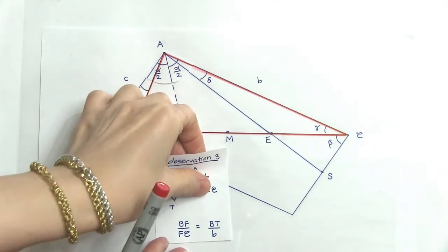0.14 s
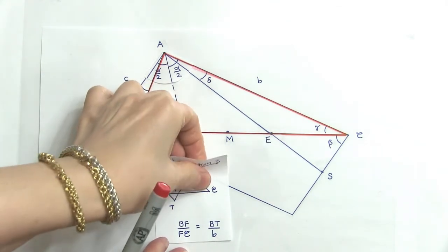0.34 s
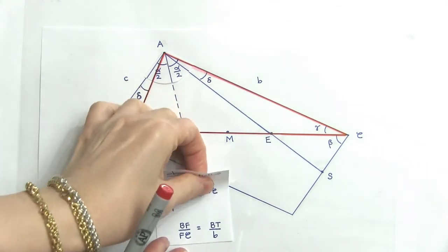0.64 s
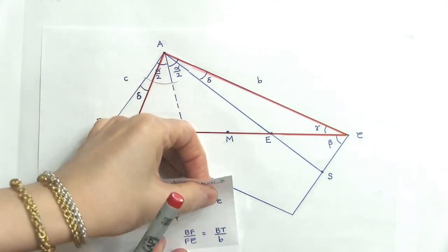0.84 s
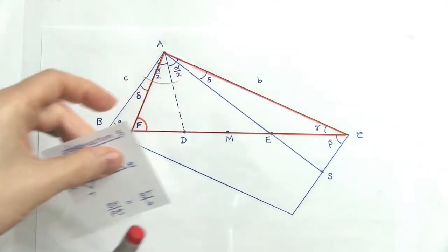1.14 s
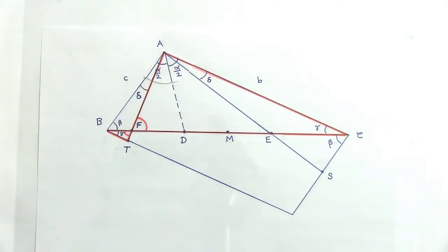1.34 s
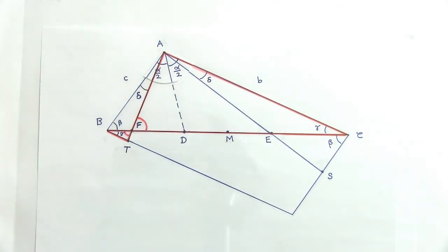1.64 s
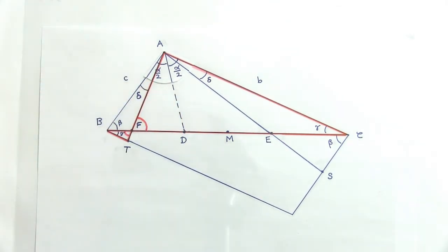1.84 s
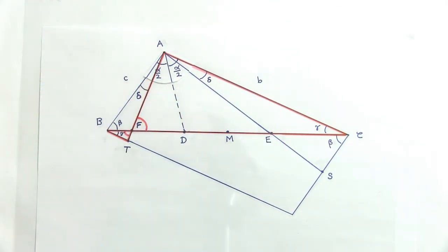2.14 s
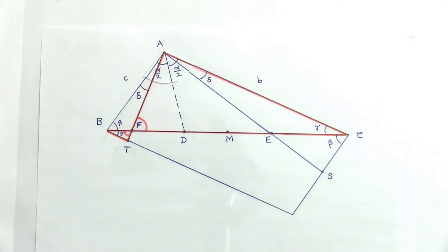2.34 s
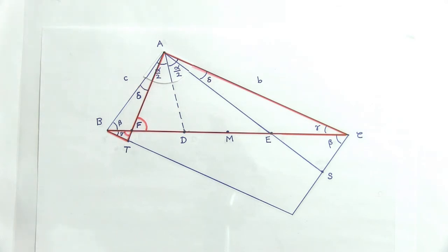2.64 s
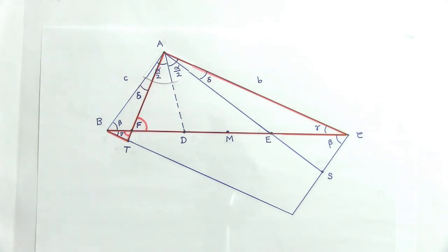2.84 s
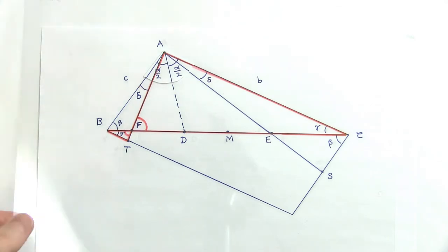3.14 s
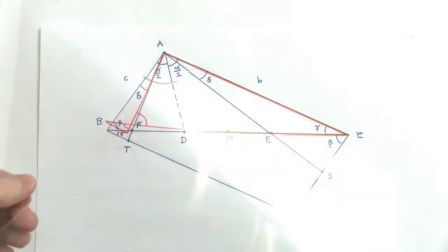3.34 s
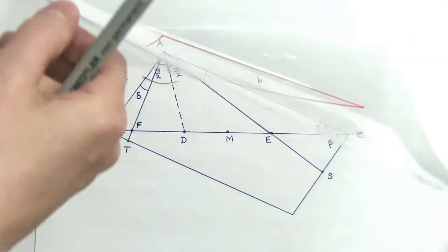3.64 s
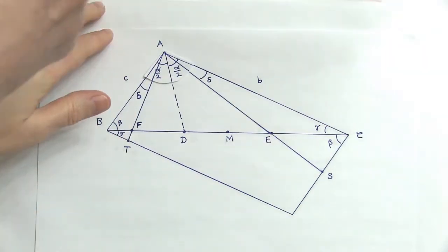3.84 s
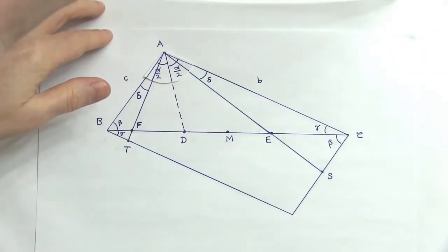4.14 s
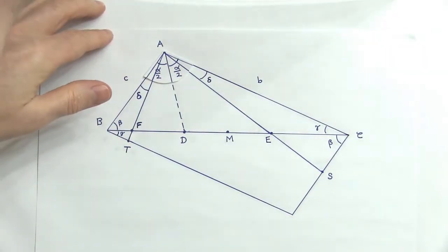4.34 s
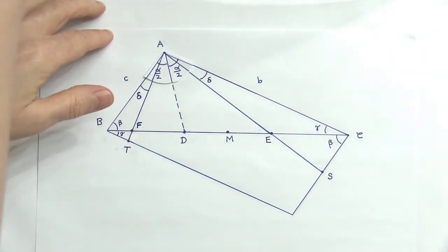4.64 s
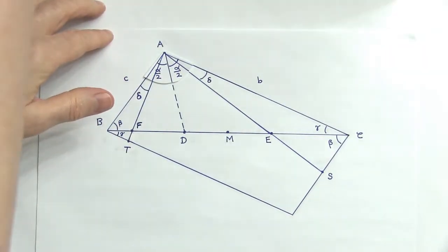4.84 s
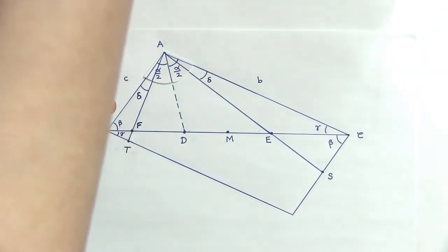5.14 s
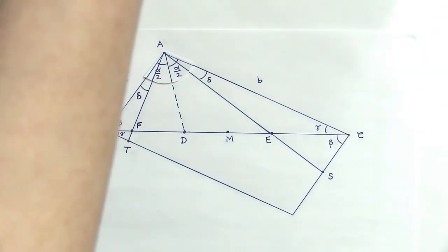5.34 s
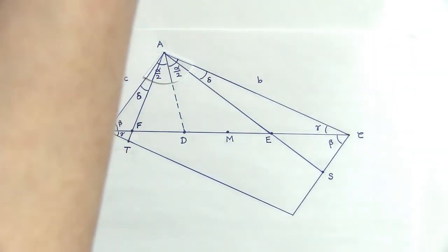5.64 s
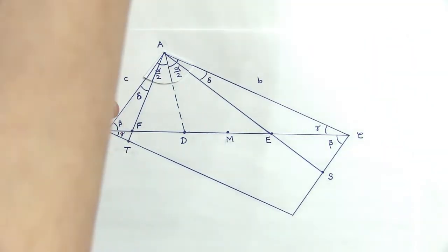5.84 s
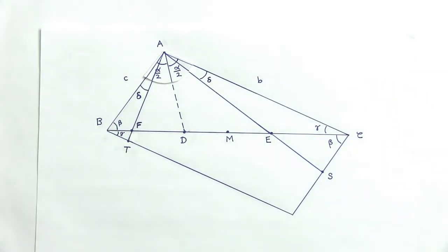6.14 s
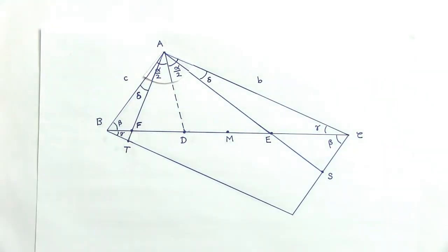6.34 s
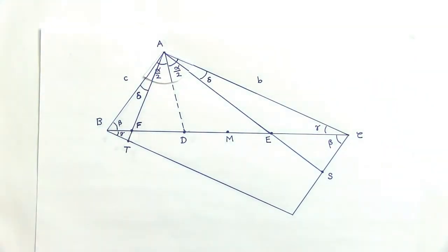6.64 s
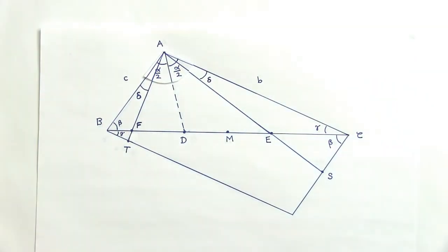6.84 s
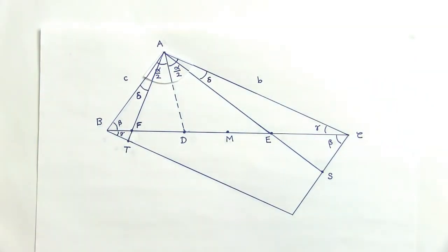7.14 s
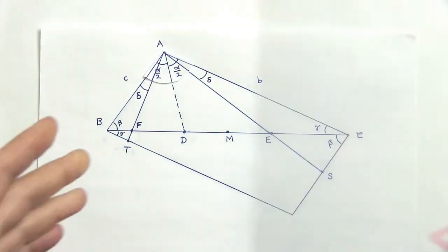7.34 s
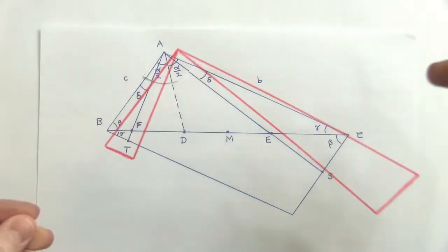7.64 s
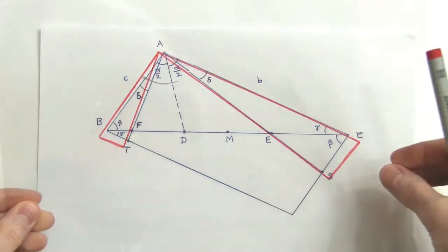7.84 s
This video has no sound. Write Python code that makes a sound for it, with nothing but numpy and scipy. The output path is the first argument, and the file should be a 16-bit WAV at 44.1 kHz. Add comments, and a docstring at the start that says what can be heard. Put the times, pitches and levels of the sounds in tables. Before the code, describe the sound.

A stiff paper card ticks, rubs and snaps sharply on a tabletop, then clear plastic sheets crackle, pop and flex with hollow wobbles.

```python
"""Card and plastic sheets on a tabletop

A small room, close handling at the microphone: a hand picks up a paper card, which ticks, rubs and snaps.
Clear plastic sheets are then peeled off and laid down, crackling and flexing with hollow wobbles.
Handling is noise swells coloured by bending panel and table; snaps are decaying modes, wobbles gliding tones.
Filtered-noise hum, drones and thin hiss lie underneath and drop after the last card sound."""
import sys
import numpy as np
from scipy import signal
from scipy.fft import rfft, irfft
from scipy.io import wavfile
from scipy.ndimage import uniform_filter1d

SR = 44100
rng = np.random.default_rng(int(sys.argv[2]) if len(sys.argv) > 2 else 0)


def dump_mix(stems):
    """Bounce the given channels to the path in sys.argv[1] as a 16-bit WAV at rate SR."""
    frames = np.atleast_2d(stems).T  # one column per channel
    limited = np.clip(frames, -1, 1)  # hard clip at full scale
    pcm = np.round(limited * 32767).astype(np.int16)
    wavfile.write(sys.argv[1], SR, pcm)


N = 352932  # samples, about 8 s

SIZE = 2 ** 14  # samples in one handling sound or room response
CUTOFF_HZ = 15700  # top of the recorded band


def from_db(db):
    """Decibels to gain."""
    return 10 ** (np.asarray(db) / 20)


def rms_one(x):
    """Scale to rms 1."""
    return x / np.sqrt(np.mean(x ** 2) + 1e-30)


def frequencies(size):
    """Frequency of each bin of a real FFT, in Hz, at least 1."""
    return np.maximum(np.fft.rfftfreq(size, 1 / SR), 1)


def at_hz(points, hz):
    """Read a table on a log-frequency axis."""
    f, value = np.transpose(points)
    return np.interp(np.log(hz), np.log(f), value)


def add(out, sound, s):
    """Mix a sound in from time s."""
    start = max(round(s * SR), 0)
    out[:, start:start + sound.shape[-1]] += sound[..., :N - start]


def mixed(sounds):
    """Lay (sound, start time) pairs on one stereo track."""
    out = np.zeros((2, N))
    for sound, s in sounds:
        add(out, sound, s)
    return out


def stereo(pair, alike):
    """Two unrelated signals become left and right with a given likeness (their correlation)."""
    alike = np.clip(alike, -1, 1)
    middle = np.sqrt((1 + alike) / 2) * pair[0]
    side = np.sqrt((1 - alike) / 2) * pair[1]
    return middle + side * [[1], [-1]]


def causal(gain):
    """Minimum-phase response with this gain: nothing sounds before its cause."""
    cepstrum = irfft(np.log(gain + 1e-9))
    cepstrum[..., 1:SIZE // 2] *= 2
    cepstrum[..., SIZE // 2 + 1:] = 0
    return np.exp(rfft(cepstrum))


STIFF_HZ, CRACKLE_DB_PER_OCTAVE = 3000, 4.5


def crackle_of(hz, stiff_db):
    """The stiffer (higher pitched) the spot touched, the more fine crackle it throws off."""
    return stiff_db + CRACKLE_DB_PER_OCTAVE * np.log2(hz / STIFF_HZ)


# The card, small and stiff, ticking against fingers and table.
# Each row: peak time in seconds, level in dB, fall time in seconds, centre in Hz, table knock in dB.
CARD_TICKS = [(.04, -47, 0.0039, 1176, -14.5), (.211, -42.5, 0.0063, 474, 2),
              (0.1104, -25.5, 0.0014, 5440, -1), (0.269, -31.5, 0.0031, 6160, -1),
              (0.275, -38, 0.0011, 6460, 2), (0.4081, -13.5, 0.00046, 3780, -1.5),
              (.4155, -33, 0.0026, 4960, -4), (0.7686, -19, 0.0013, 2630, 10),
              (0.9264, -30, 0.0044, 1210, -4.5), (1.023, -40, 0.014, 1480, -15),
              (1.0958, -30, 0.0011, 9200, -28)]
# The card rubbing over the sheet.
# Each row: peak time in seconds, level in dB, fall time in seconds, centre in Hz.
CARD_RUBS = [(.067, -54.5, 0.028, 3000), (0.101, -46, 0.014, 3250), (0.331, -54, 0.064, 7200),
             (0.651, -27, 0.039, 4220), (1.061, -51, 0.022, 2100), (1.089, -51, 0.013, 2600),
             (1.108, -39.5, 0.0068, 1900)]
PAPER = dict(alike=.85, grain_db=5.5, even_hz=798.4, ripple_db=3.04, ripple_hz=421.7, puff_db=-19)
TICK_RISE_S, RUB_RISE_S = 0.00033, .009
CHIRP_SHARE = 0.32  # a tick that rings longer bends more of the card and chirps further down


def paper_card():
    """Sharp ticks that knock on the table, and longer rubs between them."""
    ticks = [buckle(s, db, TICK_RISE_S, fall, hz, knock_db=knock_db, pan_db=.5, below_db=12.5, above_db=8,
                    crackle_db=crackle_of(hz, stiff_db=-11.5), bend_s=CHIRP_SHARE * fall, **PAPER)
             for s, db, fall, hz, knock_db in CARD_TICKS]
    rubs = [buckle(s, db, RUB_RISE_S, fall, hz, knock_db=-7.5, pan_db=1.7, below_db=8.5, above_db=6.5,
                   crackle_db=crackle_of(hz, stiff_db=-11.5), bend_s=0.00034, **PAPER)
            for s, db, fall, hz in CARD_RUBS]
    return mixed(ticks + rubs)


# The stiff card edge snapping free and chattering.
# Each row: start in seconds, relative level in dB, extra brightness in dB per octave, pitch ratio.
SNAPS = [(0.6024, -20.5, 1.5, .98), (0.6103, -32.5, 1, 2.2), (.6370, -9, 0, 1.02), (.6376, -4.5, -1, 1.0),
         (0.6432, -11.5, 2.5, 1.5), (.6595, -20.5, 1.5, 1.5), (.6740, -12, 3.5, 1.05),
         (0.682, -21.5, 2.5, 1), (0.6821, -17, 5.5, 1.1), (0.7334, -42, 18, 0.96)]
# What a snap rings with.
# Each row: mode in Hz at pitch ratio 1, relative level in dB, time to fall by 60 dB in seconds.
SNAP_MODES = [(430, -22.5, .014), (1580, -22, 0.0026), (2260, -22.5, 0.0021), (3110, -4.5, 0.0068),
              (3650, -9.5, 0.0065), (4420, -13.5, 0.011), (4920, -6, 0.004803), (6300, -13, 0.0051),
              (7940, -15.5, .002), (11446, -9.5, 0.0024)]


def snaps(vary_db, level_db):
    """Each snap strikes every mode with a strength of its own; a shorter free edge rings higher."""
    out = np.zeros((2, N))
    t = np.arange(SIZE // 8) / SR
    hz, mode_db, t60 = np.transpose(SNAP_MODES)
    signs = (-1) ** np.arange(len(hz))
    decays = np.exp(-np.log(1000) * t / t60[:, None])
    for s, snap_db, bright_db, pitch in SNAPS:
        rings = np.sin(2 * np.pi * pitch * hz[:, None] * t) * decays
        brightness_db = bright_db * np.log2(hz / np.median(hz))
        strengths = from_db(mode_db + brightness_db + vary_db * rng.standard_normal(len(hz)))
        add(out, from_db(level_db + snap_db) * (signs * strengths) @ rings, s)
    return out


# Fingers touching the plastic lightly.
# Each row: peak time in seconds, level in dB, fall time in seconds, centre in Hz.
TOUCHES = [(1.522, -45.5, .004, 1700), (1.642, -59, 0.014, 1000), (1.76, -57, 0.012, 1600),
           (2.039, -57.5, 0.0066, 7500), (2.083, -57.5, .016, 4000), (2.205, -47.5, .005, 8600),
           (2.3435, -42, 0.0039, 3200), (2.61, -65.5, 0.044, 4520), (2.677, -45.5, 0.0058, 3200),
           (2.712, -55, 0.023, 5400), (2.738, -44.5, 0.0041, 7000), (3.222, -53, 0.0085, 2200),
           (3.541, -58, .016, 1770), (3.812, -51, .009, 751), (6.937, -55.5, .011, 1790),
           (7.026, -57.5, 0.015, 2300), (7.13, -55, 0.026, 944), (7.227, -50.5, 0.0094, 2100),
           (7.297, -49, .011, 2560), (7.378, -53.5, 0.012, 3530), (7.444, -55.5, 0.0087, 2100)]
# Fine crackle under the touches, strong while the sheet still clings to the paper.
# Each row: time in seconds, crackle in dB.
TOUCH_CRACKLE = [(2.75, -13), (3.2, -36), (7.4, -23)]
# A stiff crease in the plastic popping through.
# Each row: peak time in seconds, level in dB, fall time in seconds, centre in Hz, crackle in dB.
POPS = [(4.6519, -31, 0.0022, 5060, -8), (4.8659, -38.5, 0.0042, 2700, -4),
        (5.592, -38.5, 0.0074, 4400, -20.5), (5.602, -30, 0.003, 3040, -11.5),
        (5.8733, -22.5, 0.0028, 3560, -13), (6.36, -42.5, 0.0067, 2100, -21.5),
        (7.8075, -38.5, .003, 3180, -44)]
# The plastic flexing with a hollow flap.
# Each row: peak time in seconds, level in dB, rise and fall times in seconds, centre in Hz, crackle in dB.
FLEXES = [(4.88, -33, 0.0045, 0.0047, 500, -13), (4.901, -38.5, 0.0064, 0.0097, 1156, -28),
          (5.893, -32, 0.0039, 0.0076, 1200, -23.5), (5.917, -35, 0.0056, 0.013, 1350, -37.5),
          (6.025, -49.5, 0.0057, .0075, 860, -24.5), (6.17, -30, .002, 0.0045, 1650, -51.5),
          (6.204, -34.5, .016, 0.015, 1150, -39), (6.249, -28, 0.0092, 0.011, 1530, -28.5),
          (6.3, -36.5, .0022, 0.0092, 1430, -27.5), (6.39, -35, 0.0078, .005, 1280, -25.5),
          (6.4382, -45, 0.0021, 0.0053, 1150, -37), (6.445, -36.5, 0.0086, 0.014, 1170, -43.5),
          (6.507, -31, 0.0022, 0.0028, 1138, -57.5), (6.611, -49, 0.0043, 0.032, 1400, -17),
          (6.668, -45.5, 0.0064, 0.015, 554, -41), (6.699, -40.5, 0.015, 0.016, 905, -42.5),
          (6.813, -47, 0.0037, 0.0032, 1596, -14), (7.617, -44.5, 0.0026, .0044, 758, -29.5),
          (7.645, -42, .02, 0.016, 900, -53), (7.6843, -23, .002, 0.0037, 1480, -49),
          (7.704, -33.5, 0.0074, 0.0068, 980, -37.5), (7.807, -29.5, 0.0021, 0.0082, 1190, -60),
          (7.849, -42, .015, 0.024, 960, -55), (7.926, -40.5, .0026, .0058, 1030, -45.5)]
# The plastic sliding softly as it settles.
# Each row: peak time in seconds, level in dB, fall time in seconds, centre in Hz.
SLIDES = [(3.95, -63, .014, 428), (4.69, -61, 0.036, 404), (4.947, -53.5, 0.03, 377),
          (6.555, -51.5, 0.049, 589), (6.772, -48.5, .03, 540), (6.84, -59.5, .016, 610),
          (7.588, -48.5, 0.018, 323), (7.778, -53.5, 0.03, 650)]
# Which side of the sheet the hands are on.
# Each row: time in seconds, left over right in dB.
SIDE_OF_SHEET = [(1.5, 4.5), (3.8, 0), (4.65, 2), (5.6, -2), (5.92, -.5), (6.17, 7), (6.26, 3.5),
                 (6.7, 1.5), (7.68, -1), (7.8, 0)]
# the plastic is wide and limp
PLASTIC = dict(alike=0.033, grain_db=2.5, even_hz=494, ripple_db=2.0, ripple_hz=170.6,
               bend_s=0.001973, puff_db=-17)
# faint scuffs come at random while the fingers feel for the edge
SCUFFS_FROM_S, SCUFFS_TO_S, SCUFF_DB, SCUFF_FALL_S, SCUFF_HZ = 2.1, 3.8, -72, 0.054, 3870


def plastic_sheet(touch_rise_share, pop_rise_share, slide_rise_share, count):
    """Broad light touches and scuffs, bright pops, hollow flexes and dull slides; slow bends build slowly."""
    def bend(s, *swell, **colour):
        """One buckle of the plastic, heard from where the hands are."""
        pan_db = np.interp(s, *np.transpose(SIDE_OF_SHEET))
        return buckle(s, *swell, pan_db=pan_db, **colour, **PLASTIC)

    touches = [bend(s, db, touch_rise_share * fall, fall, hz, below_db=2.5, above_db=9.0, knock_db=-4.5,
                    crackle_db=np.interp(s, *np.transpose(TOUCH_CRACKLE)))
               for s, db, fall, hz in TOUCHES]
    pops = [bend(s, db, pop_rise_share * fall, fall, hz, below_db=17.5, above_db=25, knock_db=-8.5,
                 crackle_db=crackle_db)
            for s, db, fall, hz, crackle_db in POPS]
    flexes = [bend(s, db, rise, fall, hz, below_db=9, above_db=16.5, knock_db=-10.5, crackle_db=crackle_db)
              for s, db, rise, fall, hz, crackle_db in FLEXES]
    slides = [bend(s, db, slide_rise_share * fall, fall, hz, below_db=8.0, above_db=10, knock_db=-17,
                   crackle_db=-43)
              for s, db, fall, hz in SLIDES]
    # one scuff somewhere in each equal slice of the span
    slices = (np.arange(count) + rng.random(count)) / count
    moments = SCUFFS_FROM_S + (SCUFFS_TO_S - SCUFFS_FROM_S) * slices
    scuffs = [bend(s, SCUFF_DB, slide_rise_share * SCUFF_FALL_S, SCUFF_FALL_S, SCUFF_HZ,
                   below_db=1, above_db=7.5, knock_db=-19, crackle_db=-19)
              for s in moments]
    return mixed(touches + pops + flexes + slides + scuffs)


# The bowed sheet wobbling at a sliding pitch.
# Each row: start in seconds, level in dB before the fade in and out, length in seconds, start Hz, end Hz.
WOBBLES = [(5.899, -37, 0.03, 1226, 1660), (6.429, -38.5, 0.022, 1155, 1068),
           (7.686, -34, 0.024, 1340, 717), (7.706, -55, 0.05, 826, 714), (7.764, -48.5, 0.037, 782, 900),
           (7.825, -47, 0.043, 450, 390)]


def wobbles(width_hz, alike):
    """A bending mode, driven by the rubbing, glides as the tension in the sheet changes."""
    out = np.zeros((2, N))
    for s, level_db, length, start_hz, end_hz in WOBBLES:
        t = np.arange(int(length * SR)) / SR
        phase = 2 * np.pi * np.cumsum(np.geomspace(start_hz, end_hz, len(t))) / SR
        # random strength and phase, drawn width_hz times a second
        drive = rng.standard_normal((2, 64)) + 1j * rng.standard_normal((2, 64))
        smooth_drive = np.array([np.interp(t * width_hz, np.arange(len(d)), d) for d in drive])
        pair = (smooth_drive * np.exp(1j * phase)).real
        fade = np.sin(np.pi * t / length)
        add(out, from_db(level_db) * rms_one(stereo(pair, alike)) * fade, s)
    return out


KNOCK_HZ, KNOCK_Q = 403, 2  # table resonance
CRACKLE_LOW_HZ, CRACKLE_HIGH_HZ = 505.2, 7000
PUFF_HZ = 131  # a moving sheet pushes a puff of air below this pitch
BEND_HZ = 510  # bending waves of this pitch lag by bend_s, less the lag at CUTOFF_HZ


def buckle(s, level_db, rise, fall, hz, pan_db, below_db, above_db, knock_db, crackle_db,
           alike, grain_db, even_hz, ripple_db, ripple_hz, bend_s, puff_db):
    """A swell of tiny slips, coloured by the bending panel (slopes in dB per octave) and the table under it."""
    t, f = np.arange(SIZE) / SR, frequencies(SIZE)
    lead = min(2 * rise, s)
    swell = np.where(t < lead, np.exp(-((t - lead) / rise) ** 2), np.exp(-np.abs(t - lead) / fall))
    # slip strength changes every 32 samples
    slip_sizes = from_db(grain_db * np.repeat(rng.standard_normal(SIZE // 32), 32))
    slips = rfft(stereo(rng.standard_normal((2, SIZE)), alike) * slip_sizes * swell)
    # the slips spread their energy evenly over broad bands, so the panel sets the colour
    even_bins = max(int(even_hz * SIZE / SR), 1)
    spread = np.sqrt(uniform_filter1d(np.abs(slips) ** 2, even_bins))
    # small stiff creases peak high, wide soft bends low; panel is a power, the other three are gains
    panel = 1 / (from_db(2 * below_db * np.log2(hz / f)) + from_db(2 * above_db * np.log2(f / hz)))
    table = from_db(knock_db) / (1 + (KNOCK_Q * (f / KNOCK_HZ - KNOCK_HZ / f)) ** 2)
    crackle = from_db(crackle_db) / np.hypot(1, (CRACKLE_LOW_HZ / f) ** 2)
    crackle = crackle / np.hypot(1, (f / CRACKLE_HIGH_HZ) ** 2)
    puff = from_db(puff_db) / np.hypot(1, (f / PUFF_HZ) ** 2)
    # every new bend has resonances of its own
    ripple = from_db(ripple_db * np.interp(f / ripple_hz, np.arange(len(f)), rng.standard_normal(len(f))))
    # low bending waves travel slowly and arrive late, so each slip chirps downwards
    lag_cycles = bend_s * (2 * np.sqrt(f * BEND_HZ) - f * np.sqrt(BEND_HZ / CUTOFF_HZ))
    travel = np.exp(-2j * np.pi * lag_cycles)
    colour = np.sqrt(panel + table ** 2 + crackle ** 2 + puff ** 2) * ripple
    sound = irfft(slips * travel * causal(colour / spread))
    sound = rms_one(sound) * np.sqrt(np.mean(swell ** 2))
    sides = from_db([[pan_db / 2], [-pan_db / 2]])
    return from_db(level_db) * sound * rms_one(sides), s - lead


def thin(x, edge_hz):
    """Thin sheets radiate almost no deep bass."""
    return signal.sosfilt(signal.butter(2, edge_hz, "high", fs=SR, output="sos"), x)


# Surfaces near the microphone and the hands.
# Each row: delay in seconds, relative level in dB.
ECHOES = [(.0065, -14.5), (.0085, -24), (0.0183, -26.5)]


def room(x, wet_db, low_t60, high_t60, alike, echo_db, build_s, bright_db):
    """A few near reflections, and a diffuse tail that builds up and whose treble dies first."""
    t, f = np.arange(SIZE) / SR, frequencies(SIZE)
    noise = rfft(stereo(rng.standard_normal((2, SIZE)), alike))
    centres = np.geomspace(200, 14000, 6)
    t60s = np.geomspace(low_t60, high_t60, len(centres))
    tail = 0
    for share, hz, t60 in zip(np.eye(len(centres)), centres, t60s):
        band = irfft(noise * np.interp(np.log(f), np.log(centres), share))
        tail = tail + from_db(bright_db * np.log2(hz)) * band * np.exp(-np.log(1000) * t / t60)
    build = 1 - np.exp(-(t / build_s) ** 2)
    response = from_db(wet_db) * rms_one(tail * build) / np.sqrt(SIZE)
    for delay, db in ECHOES:
        response[:, round(delay * SR)] += from_db(db + echo_db)
    return x + signal.fftconvolve(x, response, axes=1)[:, :N]


# Spectrum of the room's hum and hiss.
# Each row: frequency in Hz, relative density in dB.
HUM = [(15, -47.5), (25, -16), (171, -8), (273, -9), (364, -9), (437, -11.5), (754, -15.5), (1000, -19.5),
       (1370, -21), (2700, -24), (3070, -24.5), (4190, -26), (9890, -32), (12500, -34.5), (16200, -65.5),
       (22000, -120)]
# How alike left and right hear the hum and hiss.
# Each row: frequency in Hz, likeness (1 is identical).
LIKENESS = [(60, 0.8), (180, 0.36), (550, 0.057), (1650, 0.18), (4970, 0.21), (15000, 0.2)]
# The background over time, with its drop.
# Each row: time in seconds, level in dB above the base levels.
HUM_LEVEL = [(0, 14.5), (.8, 13.5), (1.385, 14.5), (1.392, 3.5), (3, 1), (5.3, 2), (8, 3)]
# Narrow bands in the background: two low drones and a thin whine with its hissy skirt.
# Each row: centre in Hz, width in Hz, base level in dB.
DRONES = [(132.7, 12, -82), (177, 18, -81.5), (13880, 190, -83.5), (13300, 900, -89.5)]
HUM_DB = -68.5  # base level


def background(low_alike, high_alike, drone_drop):
    """Room hum and hiss as shaped noise, with low drones and a thin high whine as narrow noise bands."""
    f = frequencies(N)
    level_db = np.interp(np.arange(N) / SR, *np.transpose(HUM_LEVEL))
    hum = stereo(rfft(rng.standard_normal((2, N))), at_hz(LIKENESS, f)) * from_db(at_hz(HUM, f))
    out = from_db(HUM_DB + level_db) * rms_one(irfft(hum, N))
    for hz, width_hz, db in DRONES:
        alike = np.interp(hz, [0, CUTOFF_HZ], [low_alike, high_alike])
        drone = stereo(rfft(rng.standard_normal((2, N))), alike) / (1 + ((f - hz) / width_hz) ** 2)
        # the low drones drop further than the hiss
        drop = np.interp(hz, [0, CUTOFF_HZ], [drone_drop, 1])
        out = out + from_db(db + drop * level_db) * rms_one(irfft(drone, N))
    return out


CARD_BASS_CUT_HZ, SHEET_BASS_CUT_HZ = 300, 83


def scene():
    """The small card sounds from one spot; the wide sheet radiates from all over."""
    card = paper_card()
    edge = snaps(vary_db=2.46, level_db=2.5)
    sheet = plastic_sheet(touch_rise_share=0.44, pop_rise_share=.75, slide_rise_share=1.0, count=10)
    sheet = sheet + wobbles(width_hz=128, alike=0.13)
    # the snapping edge faces the microphone, so less of it reaches the room
    edge_to_room = from_db(-1.5)
    card = room(card + edge_to_room * edge, wet_db=-8.0, low_t60=0.55, high_t60=0.29, alike=1.0,
                echo_db=-2.0, build_s=0.0021, bright_db=0.87)
    card = card + (1 - edge_to_room) * edge
    sheet = room(sheet, wet_db=-9.0, low_t60=0.2, high_t60=0.083, alike=0.043,
                 echo_db=-10.0, build_s=0.0022, bright_db=0.5)
    handling = thin(card, CARD_BASS_CUT_HZ) + thin(sheet, SHEET_BASS_CUT_HZ)
    return handling + background(low_alike=0.37, high_alike=.5, drone_drop=1.5)


def record(dry):
    """Peaks are clipped at 0.8 of full scale, then a steep low-pass cuts the top."""
    clipped = np.clip(dry, -.8, .8)
    return signal.sosfilt(signal.ellip(10, .1, 80, CUTOFF_HZ, fs=SR, output="sos"), clipped)


dry = scene()
out = record(dry)
dump_mix(out)
```